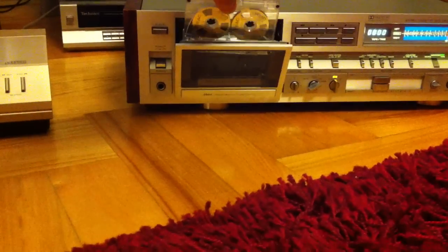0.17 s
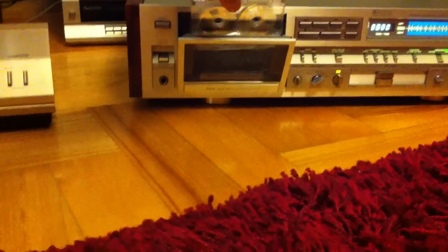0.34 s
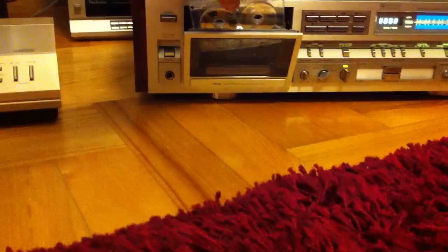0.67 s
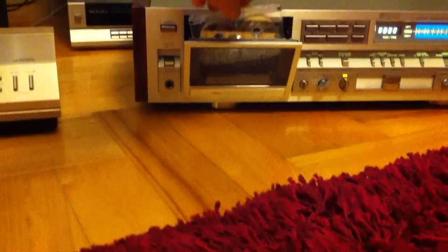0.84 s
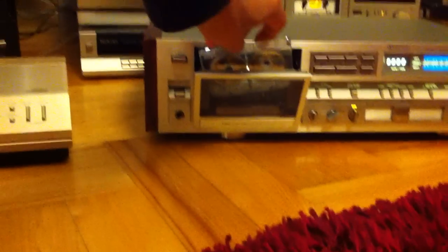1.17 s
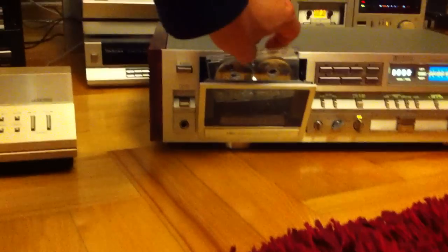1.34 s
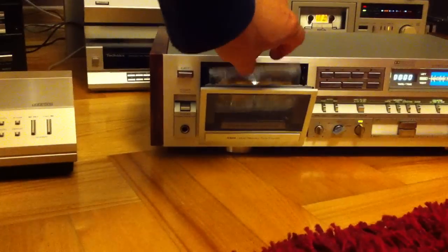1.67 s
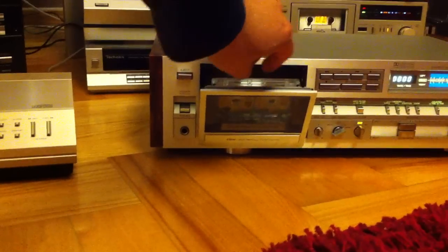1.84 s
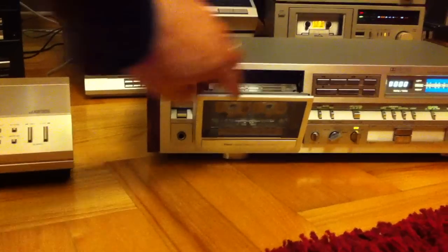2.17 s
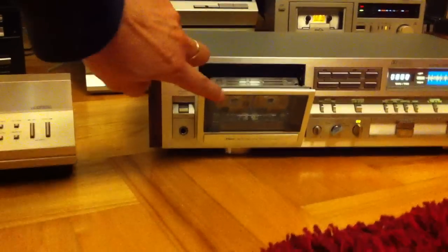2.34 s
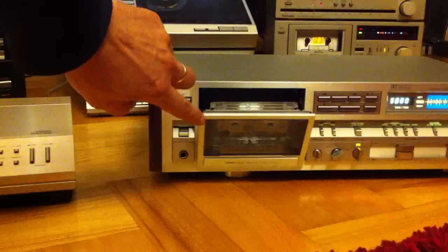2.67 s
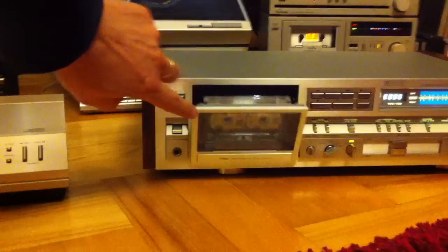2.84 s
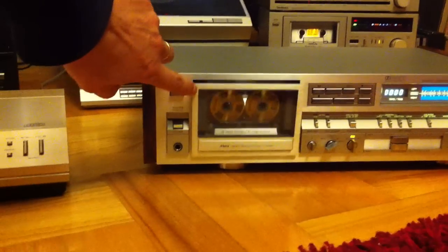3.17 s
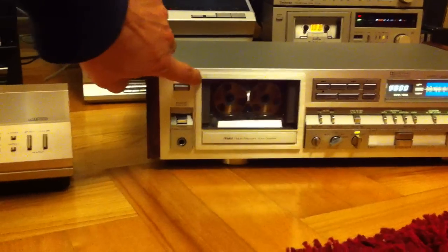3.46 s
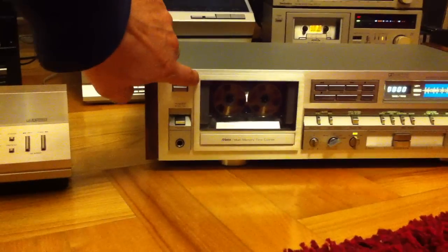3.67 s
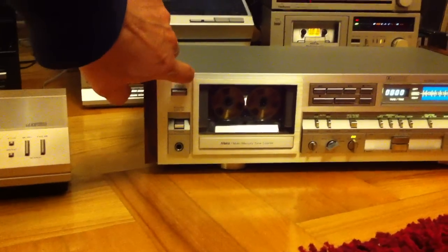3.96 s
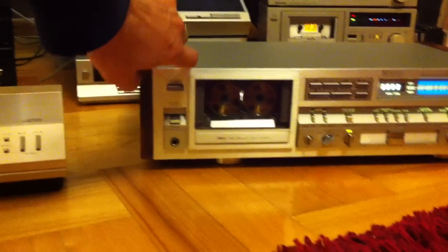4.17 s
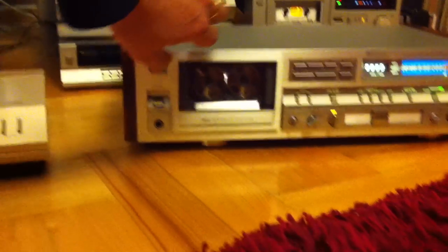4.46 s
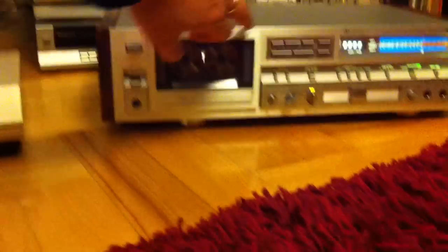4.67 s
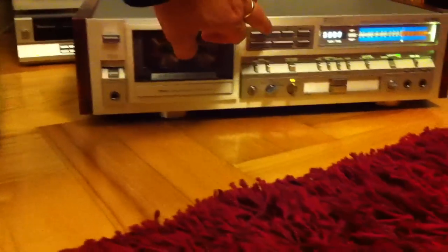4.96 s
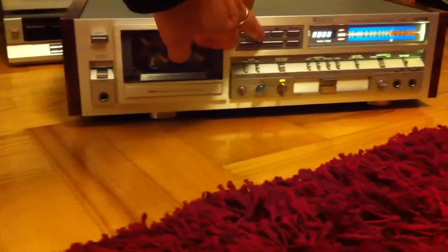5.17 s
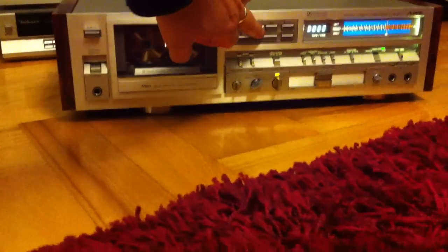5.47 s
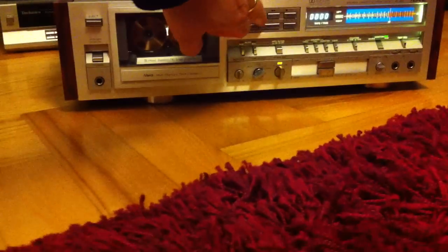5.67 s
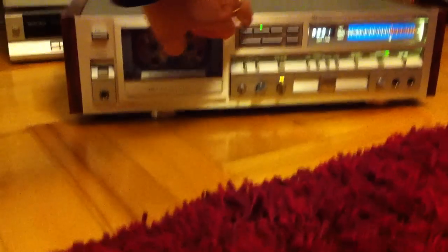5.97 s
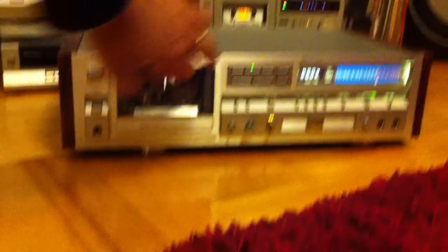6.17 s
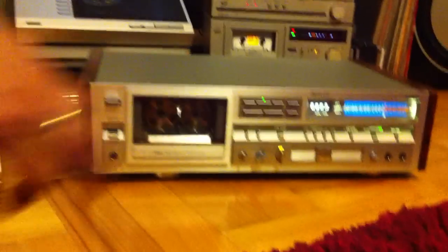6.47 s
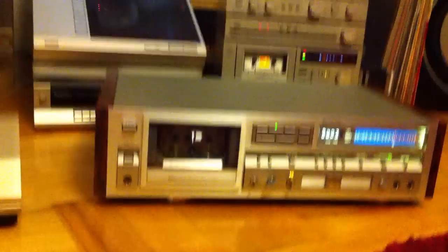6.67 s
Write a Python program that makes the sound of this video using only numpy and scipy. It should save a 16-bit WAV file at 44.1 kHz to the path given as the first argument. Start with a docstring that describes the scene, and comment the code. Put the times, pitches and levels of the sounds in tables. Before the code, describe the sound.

A plastic cassette is fumbled into the open door of a tape deck, heard close by in a living room. Light, irregular clicks and scrapes run through the first second and a half, with a sharper knock near 1 second. At about 1.9 seconds the cassette slides and drops home with a quick clack, the loudest sound. From 3 seconds the door rubs and rattles softly as it is pushed, then latches with a firm snap at 3.5 seconds. After a pause, a key clicks down and back at about 5.5 seconds, and the mechanism engages with a quick cluster of softer clicks and clunks until 5.9 seconds. A spring rings on faintly and fades toward the end, near 7 seconds, with a barely audible sleeve rustle. Faint electrical hum and hiss lie underneath throughout.

```python
"""Loading a tape deck

A cassette is fumbled into the open door of a deck and drops home; the door is pushed shut and latches.
A key is pressed, the transport clunks into place and a spring rings on. Impacts and friction excite
the damped modes of each part, heard close by in a living room over faint mains hum and hiss."""
import sys
import numpy as np
from scipy import signal
from scipy.fft import rfft, irfft
from scipy.io import wavfile
from scipy.ndimage import uniform_filter1d

SR = 44100
rng = np.random.default_rng(int(sys.argv[2]) if len(sys.argv) > 2 else 0)


def master_out(mix):
    """Clip the mix to full scale and print it as 16-bit PCM to the path in sys.argv[1]."""
    frames = np.transpose(np.atleast_2d(mix))
    ceiling = np.clip(frames, -1, 1)
    pcm = np.round(ceiling * 32767).astype(np.int16)
    wavfile.write(sys.argv[1], SR, pcm)


N = 300762
TIME = np.arange(N) / SR


def from_db(db):
    """Amplitude ratio of a level in decibels."""
    return 10 ** (np.asarray(db) / 20)


def unit_rms(x):
    """Scale to unit rms."""
    return x / np.sqrt(np.mean(x ** 2) + 1e-20)


def unit_burst(x):
    """Scale so that the loudest 6 ms have unit rms."""
    return x / np.sqrt(uniform_filter1d(x ** 2, size=265, mode="constant").max() + 1e-20)


def band(x, low_hz, high_hz, order=2):
    """Causal Butterworth band-pass."""
    return signal.sosfilt(signal.butter(order, [low_hz, high_hz], "band", fs=SR, output="sos"), x)


def at_hz(rows, hz):
    """Interpolate the columns of a table along log frequency."""
    points, *columns = np.transpose(rows)
    return [np.interp(np.log(hz + 1), np.log(points), column) for column in columns]


def add(out, s, sound):
    """Superpose a sound, starting at time s."""
    start = round(s * SR)
    out[start:start + len(sound)] += sound[:N - start]


def grit(count, spread_db):
    """Surface roughness: dense micro-contacts of log-normal size."""
    return unit_rms(rng.standard_normal(count) * from_db(spread_db * rng.standard_normal(count)))


def stroke(s, level_db, swell_s, fade_s):
    """Exponential envelope of a rub: up 20 dB in swell_s to its peak, down 20 dB in fade_s."""
    from_peak = np.maximum((s - TIME) / swell_s, (TIME - s) / fade_s)
    return from_db(level_db - 20 * np.minimum(from_peak, 10))


def ringing(modes, t, scatter_db):
    """Free vibration: a sum of damped modes, their levels scattered at random."""
    hz, level_db, t60 = np.transpose(modes)[:, :, None]
    strength = from_db(level_db + scatter_db * rng.standard_normal(hz.shape))
    phase = rng.random(hz.shape)   # each mode reaches the listener by its own path
    return np.sum(strength * from_db(-60 * t / t60) * np.sin(2 * np.pi * (hz * t + phase)), axis=0)


def struck_at(modes, pitch_hz, favour_db=9, width_octaves=0.3):
    """The point of excitation favours the modes near one frequency."""
    hz, level_db, t60 = np.transpose(modes)
    nearness = np.exp(-(np.log2(hz / pitch_hz) / width_octaves) ** 2)
    return np.column_stack([hz, level_db + favour_db * nearness, t60])


def by_range(modes):
    """Group modes as knock (middle), thump (low), then crack, snap and tick (rising treble)."""
    place = np.digitize(modes[:, 0], [550, 2000, 4200, 7800])
    return [modes[place == k] for k in (1, 0, 2, 3, 4)]


# Pass bands of knock, thump, crack, snap and tick: lower f/Hz, upper f/Hz
RANGE_EDGES = [(620, 1750), (175, 620), (2300, 4200), (4400, 7400), (8400, 17000)]
# Balance in those bands: crackle level re the modes/dB, trim/dB
RANGE_BALANCE = [(-10.5, -3), (-5.5, -3), (-1.5, -4.5), (-0.5, -4.5), (4, -2.5)]
def impact(modes, levels_db, length_ms, rattle, rise_s=0.0024):
    """Impact excitation: an impulse and brief chatter ring a part and crackle on its surface."""
    t = TIME[:SR // 5]
    knock_db, thump_db, crack_db, tick_db = levels_db
    snap_db = (crack_db + tick_db) / 2   # the treble slopes evenly
    range_db = knock_db, thump_db, crack_db, snap_db, tick_db
    envelope = (1 - np.exp(-t / rise_s)) * np.exp(-t * 1000 / max(length_ms, 1))
    chatter = grit(len(t), spread_db=4.5) * envelope
    chatter /= np.linalg.norm(chatter)
    force = rattle * chatter
    force[SR // 2000] += 1   # the first touch
    out = 0
    for db, edges, (crackle_db, trim_db), own in zip(range_db, RANGE_EDGES, RANGE_BALANCE, by_range(modes)):
        vibration = signal.fftconvolve(force, ringing(own, t, scatter_db=2))[:len(t)]
        tone = unit_burst(band(vibration, *edges))
        crackle = unit_burst(band(chatter, *edges, order=3))
        out += from_db(db + trim_db) * unit_burst(tone + from_db(crackle_db) * crackle)
    cabinet_give = unit_burst(band(chatter, 15, 70, order=1))
    return out + from_db((thump_db + tick_db) / 2 - 24) * cabinet_give


def impacts(hits, modes, rattle, pitch_hz, thump, crack):
    """Blows on one part. Thump follows level and crack follows brightness, each as (offset/dB, slope)."""
    out = np.zeros(N)
    (thump_offset_db, thump_slope), (crack_offset_db, crack_slope) = thump, crack
    mean_db = np.mean([hit[1] for hit in hits])
    for s, knock_db, bright_db, length_ms in hits:
        thump_db = mean_db + thump_offset_db + thump_slope * (knock_db - mean_db)
        crack_db = knock_db + crack_offset_db + crack_slope * bright_db
        levels_db = knock_db, thump_db, crack_db, knock_db + bright_db
        chatter_gain = rattle * np.sqrt(length_ms / 3)   # longer contacts chatter more
        add(out, s, impact(struck_at(modes, pitch_hz), levels_db, length_ms, chatter_gain))
    return out


def friction(rubs, modes, pitch_hz, clump_db, thump_db):
    """Sliding friction: tiny catches, coming in clumps, drive the modes of a part."""
    body = sum(stroke(s, db, swell, fade) for s, db, _, swell, fade in rubs)
    hiss = sum(stroke(s, db + hiss_db, swell, fade) for s, db, hiss_db, swell, fade in rubs)
    catches = grit(N, spread_db=2.7)
    catches *= from_db(clump_db * unit_rms(uniform_filter1d(rng.standard_normal(N), size=220)))
    groups = by_range(struck_at(modes, pitch_hz))
    rings = [band(ringing(own, TIME[:SR // 8], 0), *edges) for own, edges in zip(groups, RANGE_EDGES)]
    knock, thump, crack, snap, tick = [unit_rms(signal.oaconvolve(catches, ring)[:N]) for ring in rings]
    surface = unit_rms(band(catches, 2200, 13000))
    treble = unit_rms(surface + 0.21 * crack + 0.72 * snap + 0.58 * tick)
    return body * (knock + from_db(thump_db) * thump) + hiss * treble


def flicked(flicks, modes, rise_s=0.0015):
    """Plucked vibration: a small metal part slips free and rings, the same way every time."""
    out, t = np.zeros(N), TIME[:SR // 5]
    ring = sum(from_db(db - 60 * t / t60) * np.sin(2 * np.pi * hz * t) for hz, db, t60 in modes)
    for s, level_db in flicks:
        add(out, s, from_db(level_db) * (1 - np.exp(-t / rise_s)) * ring)
    return out


# Spectrum of room noise and hiss: f/Hz, relative spectral level/dB
NOISE_SPECTRUM = [(25, -15), (60, -19.5), (95, -6), (150, 5.5), (200, 7), (250, 4.5), (330, 0.5), (600, -3),
                  (1500, -5.5), (4000, -9.5), (10000, -10.5), (15500, -10.5)]
# Mains hum: f/Hz, rms level/dB
HUM_TONES = [(98, -90.5), (147.2, -73), (245, -80.5), (383, -82.5), (534, -88)]
def background(noise_db=-67.5):
    """Stationary sound: a continuous noise spectrum plus the line spectrum of a transformer."""
    colour_db, = at_hz(NOISE_SPECTRUM, np.arange(N // 2 + 1) * SR / N)
    noise = unit_rms(irfft(rfft(rng.standard_normal(N)) * from_db(colour_db), N))
    hum = sum(from_db(db) * np.sin(2 * np.pi * (hz * TIME + rng.random())) for hz, db in HUM_TONES)
    return from_db(noise_db) * noise + np.sqrt(2) * hum


# Modes of the cassette shell: f/Hz, level/dB, T60/s
SHELL_MODES = [(166, -3, 0.12), (226, -1.5, .1), (280, -2.5, 0.11), (422, -3.5, 0.07), (517, 2.5, 0.061),
               (660, -6.5, 0.022), (936, -2, .06), (1055, -7, 0.078), (1120, -7, 0.041), (1264, 3.5, 0.048),
               (1403, 3, .035), (1553, -5.5, 0.079), (1610, -19.5, 0.095), (2405, 0.5, .03),
               (2628, -2, 0.045), (3490, -0.5, 0.032), (3660, 0, 0.034), (5400, 4, 0.015),
               (6302, -2.5, 0.072), (6374, -8.5, 0.013), (9000, 3, .03), (9720, -3, 0.047),
               (11990, -9, 0.026), (13400, -10, 0.035)]
# It rubs on its guides: peak t/s, level/dB, relative hiss level/dB, swell/s, fade/s
SHELL_RUBS = [(0, -58.5, -12, .05, 0.13), (.67, -56.5, -10, 0.023, 0.1), (1.0, -51.5, -18, .11, 0.17),
              (1.828, -47.5, -8.5, 0.079, 0.06), (1.9, -37.5, -9, 0.038, 0.055)]
# It bumps the guides, then drops home: t/s, level/dB, brightness/dB, contact length/ms
SHELL_HITS = [(.108, -40, -15.5, 2.5), (.1315, -30.5, -8.5, 6.1), (.380, -41, -18.5, 2.7),
              (.429, -48, 1.5, 6.4), (.442, -38.5, -11.5, 8), (.4585, -32.5, -3.5, 6.3),
              (.476, -34, -10.5, 12), (.624, -47, -18.5, 6.4), (.678, -46, -5.5, 17),
              (.692, -42.5, -9.5, 5.4), (.922, -46.5, -9.5, 20), (.959, -39.5, -1.5, 2.4),
              (.963, -24.5, -13.5, 2.6), (.984, -38, -10, 8), (1.039, -41, -17, 2.9),
              (1.126, -40, -12.5, 3.6), (1.433, -40.5, -1.5, 7.4), (1.451, -43, -38, 5.2),
              (1.591, -58, -32, 17), (1.8635, -26, -10, 4.4), (1.868, -19.5, -18.5, 6.2),
              (1.8765, -13, -10.5, 0.7), (1.907, -33, -5.5, 4.8)]
def cassette(release_s=1.8):
    """Damping: fingers shorten the ringing of the shell; its knocks ring longer once it is let go."""
    held_modes = np.array(SHELL_MODES) * [1, 1, 0.49]
    fumbles = [hit for hit in SHELL_HITS if hit[0] < release_s]
    drop = [hit for hit in SHELL_HITS if hit[0] >= release_s]
    out = impacts(fumbles, held_modes, rattle=0.24, pitch_hz=1370, thump=(-13.5, .45), crack=(-3, .4))
    out += impacts(drop, SHELL_MODES, rattle=0.24, pitch_hz=1250, thump=(-26, .7), crack=(-8, .35))
    return out + friction(SHELL_RUBS, held_modes, pitch_hz=1340, clump_db=5, thump_db=-10.5)


# Modes of the leaf spring in the holder: f/Hz, level/dB, T60/s
LEAF_TONES = [(6440, 3, .045), (13850, -9, .07)]
# It is flicked: t/s, level/dB
LEAF_SLIPS = [(.923, -53), (.963, -48), (3.402, -52)]
def leaf_spring():
    """Free vibration of a flicked metal strip: a high, short ping."""
    return flicked(LEAF_SLIPS, LEAF_TONES)


# A sleeve brushes past: peak t/s, level/dB, swell/s, fade/s
SLEEVE_STROKES = [(2.408, -70.5, .22, .07), (6.75, -70.5, 1, 0.97)]
def sleeve():
    """Friction of cloth: faint treble noise that swells and fades."""
    rustle = unit_rms(band(grit(N, spread_db=4), 1800, 15000, order=1))
    return sum(stroke(*row) for row in SLEEVE_STROKES) * rustle


# Modes of the door panel: f/Hz, level/dB, T60/s
PANEL_MODES = [(221.6, 1.5, 0.086), (281, -10, 0.23), (313, -8, 0.049), (397, -5, 0.015), (543, 0.5, 0.029),
               (620, -4, 0.03), (873, -1, 0.03), (991, -8, 0.1), (1080, 1.5, 0.036), (1256, -0.5, 0.03),
               (1393, 3.5, 0.023), (1552, 0, 0.044), (2544, -4, 0.033), (3376, 3, .018), (3660, -4, 0.02),
               (4320, -1, 0.013), (5580, 4, 0.015), (6320, -4, 0.041), (8900, -1, 0.018),
               (11400, -8, 0.014), (13900, -14, .025)]
# The holder rattles as the door swings: t/s, level/dB, brightness/dB, contact length/ms
HOLDER_TAPS = [(2.986, -51.5, -25, 3.2), (3.021, -45, -29, 8.7), (3.111, -57, -22, 1.8),
               (3.400, -44.5, -18.5, 7.8), (3.533, -21.5, -21.5, 1.4)]
# The door rubs: peak t/s, level/dB, relative hiss level/dB, swell/s, fade/s
PANEL_RUBS = [(3.04, -65.5, -10, 0.12, 0.049), (3.425, -51.5, -22, 0.033, 0.12),
              (3.498, -43, -23, 0.034, 0.023), (3.52, -37.5, -17, 0.0087, 0.011)]
# It meets the cabinet, latches and is let go: t/s, level/dB, brightness/dB, contact length/ms
PANEL_HITS = [(3.194, -42.5, -25, 2.7), (3.349, -55.5, -10, 13), (3.502, -39, -24, 12),
              (3.521, -23, -13.5, 6.3), (3.741, -50.5, -40, 1.7)]
def door():
    """Modal response of a panel: knocks, rattles and rubbing all excite the same resonances."""
    out = impacts(PANEL_HITS, PANEL_MODES, rattle=0.21, pitch_hz=920, thump=(-6, .89), crack=(-.5, .4))
    out += impacts(HOLDER_TAPS, PANEL_MODES, rattle=0.28, pitch_hz=1330, thump=(-18, .63), crack=(-6, .51))
    return out + friction(PANEL_RUBS, PANEL_MODES, pitch_hz=1200, clump_db=4, thump_db=-9.5)


# Mode of the latch pawl: f/Hz, level/dB, T60/s
PAWL_TONE = [(2540, 0, .025)]
# It snaps in: t/s, level/dB
PAWL_SLIP = [(3.522, -26)]
def latch_pawl():
    """Free vibration of one quickly damped mode as the door latches."""
    return flicked(PAWL_SLIP, PAWL_TONE)


# Modes of the transport key: f/Hz, level/dB, T60/s
KEY_TONES = [(226, 2, .1), (295, 0, .1), (400, -2, .05), (960, -4, .06), (1035, 3, .08), (1240, -14, .04),
             (1460, 0, .04), (1530, -1, .04), (2500, -2, .02), (3200, 1, .02), (3650, -2, .02),
             (6000, 0, .015), (7200, -1, .015), (10100, -9, .02), (12800, -3, .025), (14300, 2, .03),
             (15200, 1, .025)]
# It goes down and comes back: t/s, level/dB, brightness/dB, contact length/ms
KEY_TAPS = [(5.5365, -33, -2.5, 3), (5.606, -44, -7, 1.4)]
def key():
    """Impact excitation: the key clicks once each way."""
    return impacts(KEY_TAPS, KEY_TONES, rattle=0.73, pitch_hz=1460, thump=(-21, .17), crack=(-5, .14))


# Modes of the transport mechanism: f/Hz, level/dB, T60/s
DRIVE_MODES = [(173, -9, 0.19), (213, -4.5, 0.15), (288, -6.5, 0.12), (375, -2.5, 0.041), (704, 2.5, 0.018),
               (973, 3, 0.038), (1020, -3, 0.031), (1286, 2.5, 0.015), (1440, 0.5, 0.028),
               (1540, -11, 0.033), (2136, 6, 0.025), (2740, -17, 0.02), (3450, 10, 0.0068),
               (5280, 2, 0.0051), (6200, -5, 0.014), (9870, 7, 0.01), (12030, 6, .015)]
# Its cam turns: peak t/s, level/dB, relative hiss level/dB, swell/s, fade/s
CAM_RUBS = [(5.535, -57, -6, 0.02, 0.27), (5.86, -59, -38, 0.061, 0.17)]
# It engages: t/s, level/dB, brightness/dB, contact length/ms
DRIVE_HITS = [(5.707, -50, -1, 3.5), (5.714, -44.5, -6, 1.8), (5.747, -42, -5, 10.6),
              (5.757, -41.5, -3, 4.6), (5.844, -44, -32, 13), (5.850, -37, -1.5, 5), (5.860, -45.5, -22, 6)]
def transport():
    """Friction and impact: the cam rubs round and the mechanism clunks into place."""
    clunks = impacts(DRIVE_HITS, DRIVE_MODES, rattle=0.66, pitch_hz=1280,
                     thump=(-11.5, 1.64), crack=(-2.5, .11))
    return clunks + friction(CAM_RUBS, DRIVE_MODES, pitch_hz=1060, clump_db=6, thump_db=-3.5)


# Modes of spring and chassis: onset t/s, f/Hz, level/dB, T60/s
SPRING_MODES = [(5.852, 508, -62, 1.96), (5.852, 297.4, -64, 0.94), (5.852, 232, -50, 0.38)]
def spring():
    """Lightly damped vibration: the last clunk leaves a spring singing and the chassis humming."""
    out = np.zeros(N)
    for s, hz, level_db, t60 in SPRING_MODES:
        add(out, s, from_db(level_db - 60 * TIME / t60) * np.sin(2 * np.pi * hz * TIME))
    return out


def hollow(x, centre_hz=1925, depth_db=-4):
    """A shallow spectral notch between knock and crack makes the deck sound hollow."""
    notched = signal.lfilter(*signal.iirnotch(centre_hz, Q=4, fs=SR), x)
    return notched + from_db(depth_db) * (x - notched)


# Reverberation of the living room: f/Hz, T60/s, reverberant level/dB
REVERBERATION = [(100, .55, -7.5), (250, 0.64, -4), (541.5, 0.5, -7.5), (1245, 0.57, -13),
                 (2030, 0.33, -0.5), (4000, 0.437, -13), (8000, 0.35, -7), (15000, 0.26, -13.5)]
def room(x, early_db=-11, early_t60=0.063, gap_s=0.0016):
    """Reverberation: early reflections from floor and cabinets, and a tail that dies sooner in the treble."""
    t = TIME[:SR * 3 // 4]
    edges = np.geomspace(70, 17000, 15)
    response = 0
    for low, high in zip(edges, edges[1:]):
        tail_t60, tail_db = at_hz(REVERBERATION, np.sqrt(low * high))
        band_share = np.sqrt(2 * (high - low) / SR)
        for t60, level_db in ((tail_t60, tail_db), (early_t60, early_db)):
            decay = from_db(-60 * t / t60) * (t > gap_s)
            echoes = band(rng.standard_normal(len(t)) * decay, low, high)
            response += from_db(level_db) * band_share * echoes / np.linalg.norm(echoes)
    return signal.fftconvolve(x, response)[:N]


def scene():
    """Superposition of the deck, its reverberation and the quiet sounds around it, in mono."""
    deck = hollow(cassette() + door() + key() + transport()) + leaf_spring() + latch_pawl()
    return (deck + room(deck) + spring() + background() + sleeve())[None]


def record(dry, cutoff_hz=15900):
    """Band limiting: a steep elliptic low-pass removes the highest treble."""
    return signal.sosfilt(signal.ellip(12, .1, 80, cutoff_hz, fs=SR, output="sos"), dry)


dry = scene()
out = record(dry)
master_out(out)
```